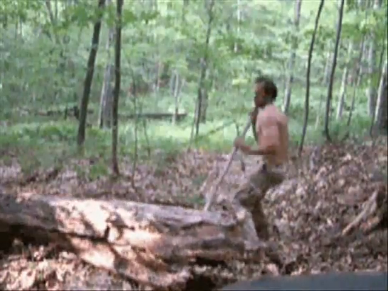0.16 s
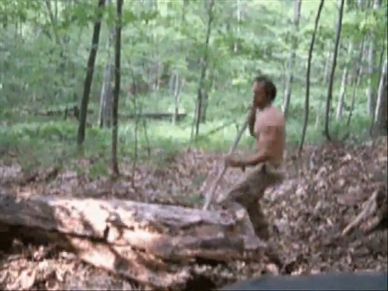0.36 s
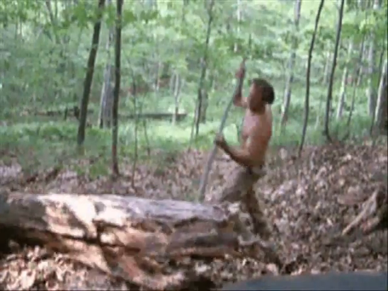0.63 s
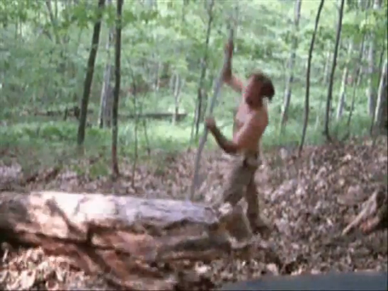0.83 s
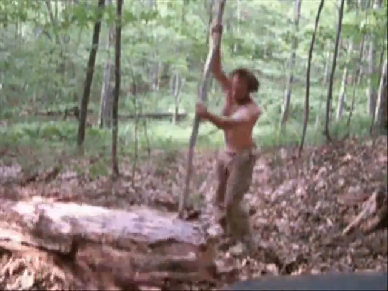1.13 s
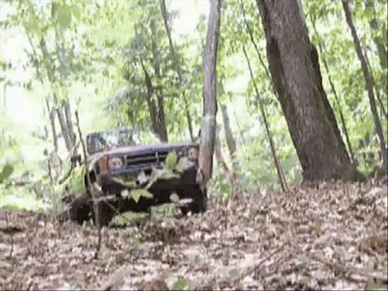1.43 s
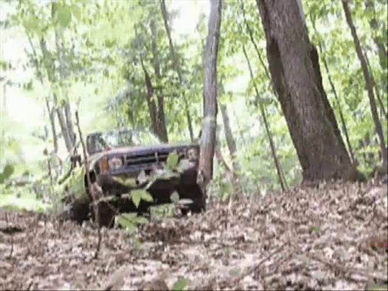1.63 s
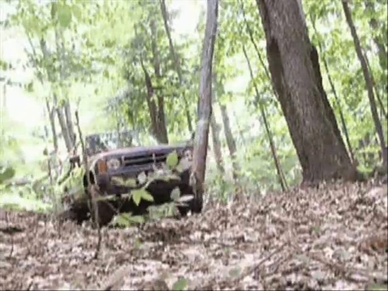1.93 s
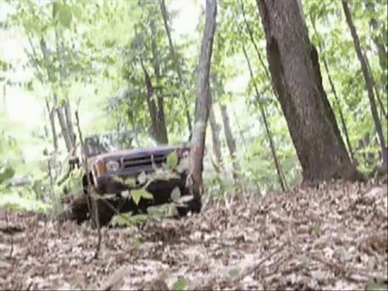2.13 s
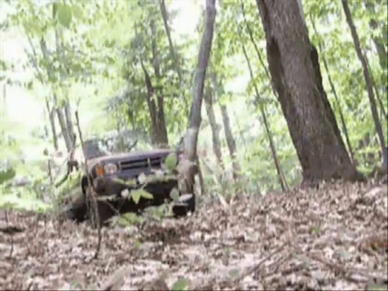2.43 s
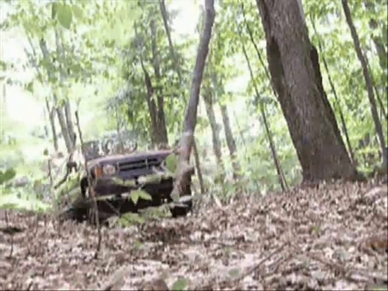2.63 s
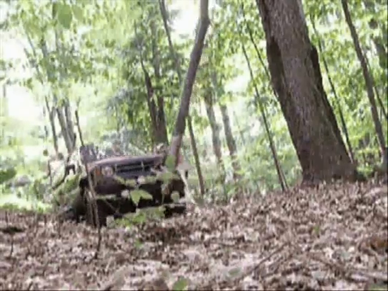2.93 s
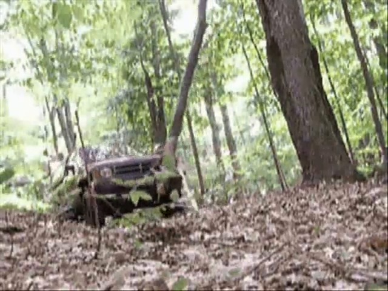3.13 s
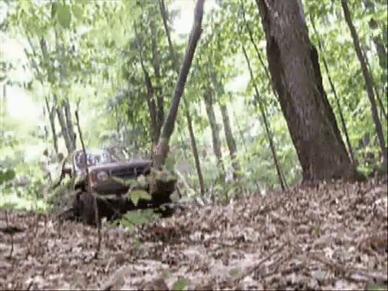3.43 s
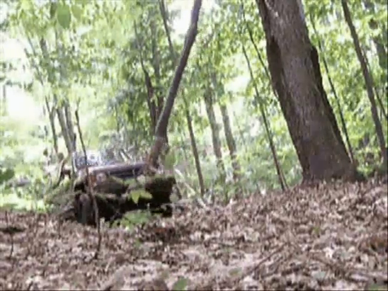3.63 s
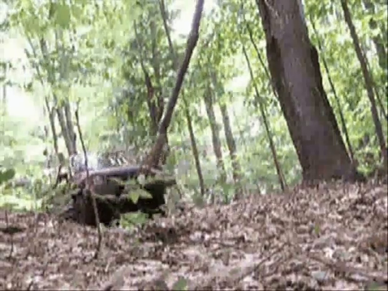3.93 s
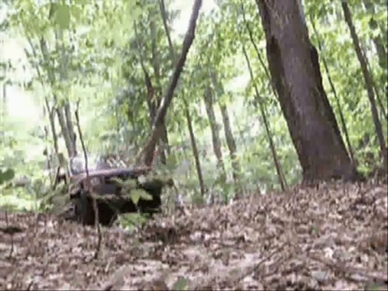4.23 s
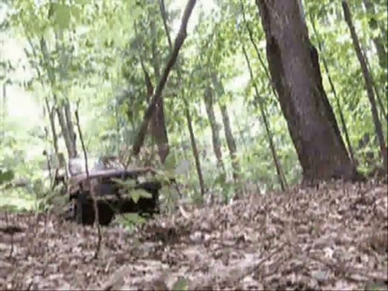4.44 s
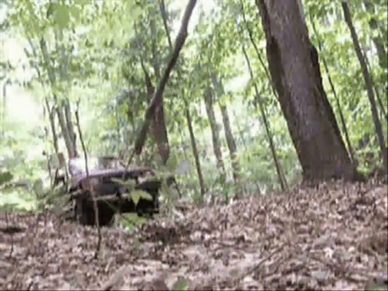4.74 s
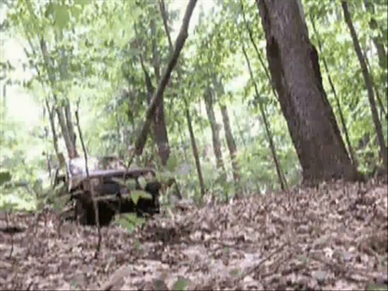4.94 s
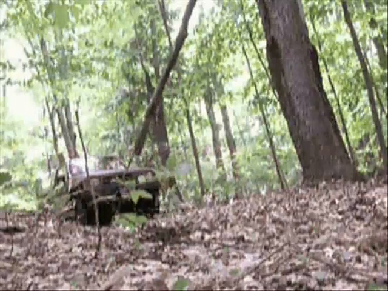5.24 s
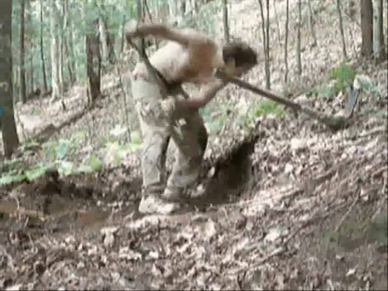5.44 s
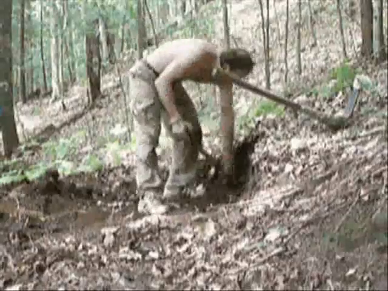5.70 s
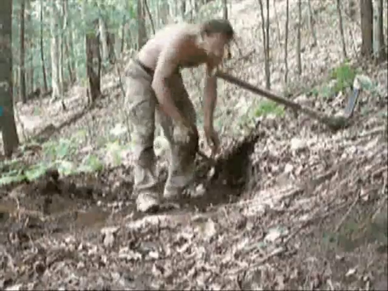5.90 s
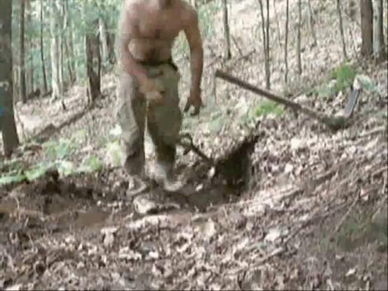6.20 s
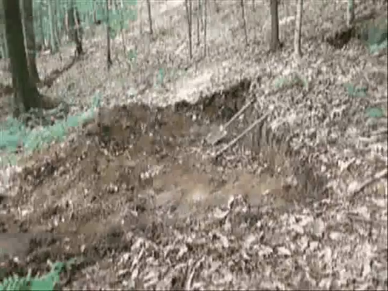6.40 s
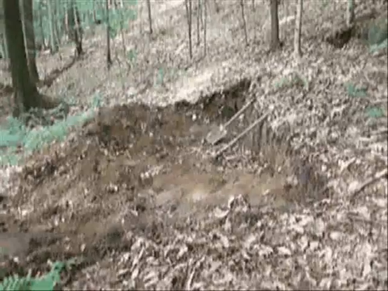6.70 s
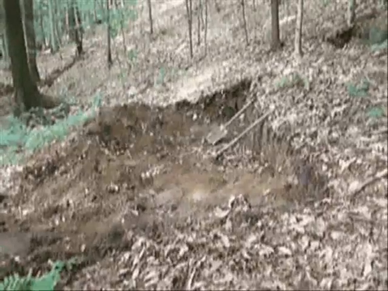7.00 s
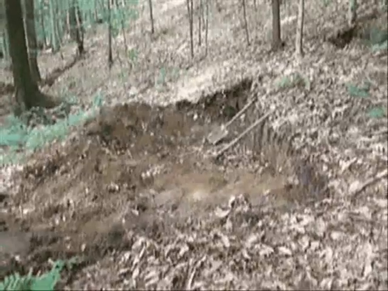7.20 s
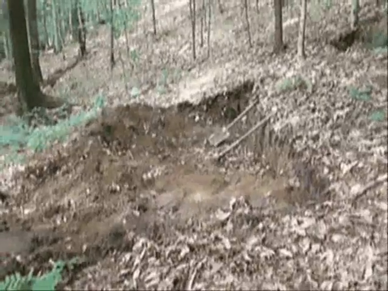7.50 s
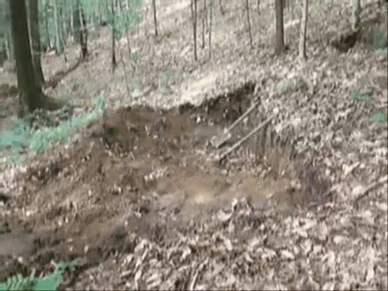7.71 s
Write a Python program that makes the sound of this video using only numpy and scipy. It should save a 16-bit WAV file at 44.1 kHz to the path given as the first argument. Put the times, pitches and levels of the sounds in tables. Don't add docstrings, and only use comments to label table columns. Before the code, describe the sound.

A log rolls crunching through dry leaves, a labouring truck snaps a dead tree with loud cracks, a spade bites soil, then near silence.

```python
import sys
import numpy as np
from scipy import signal
from scipy.fft import rfft, irfft, next_fast_len
from scipy.io import wavfile
from scipy.ndimage import uniform_filter1d, map_coordinates

SR = 44100
rng = np.random.default_rng(int(sys.argv[2]) if len(sys.argv) > 2 else 0)


def store_pcm(level_fs):
    pcm = np.round(np.clip(level_fs, -1, 1) * 32767).astype(np.int16)
    wavfile.write(sys.argv[1], SR, np.atleast_2d(pcm).T)


def rack_gain(trim_db):
    fader = np.asarray(trim_db, float)
    return 10 ** (fader / 20)


N = 346520

# start t/s, end t/s
PARTS = [
    (0, 1.36),
    (1.36, 5.366),
    (5.366, 6.447),
    (6.745, 7.9),
]

# t/s, peak level/dB, ring f/Hz, knock level/dB, splinter level/dB
CRACKS = [(3.221, -4, 3560, -21, -16), (3.252, 11.5, 1777, -9, -16), (3.2554, -10, 3354, 4, -10.5),
          (3.383, -2, 1152, -2.5, -23.5), (3.4354, 2.5, 3346, -13.5, -12), (3.466, 1, 3640, -18, -18.5),
          (3.5272, 3.5, 3064, -12.5, -14.5), (3.7335, 6, 2865, -10, -23.5),
          (3.7372, 3.5, 2996, -13.5, -16.5), (3.8291, -1, 3085, -8, -13), (3.8781, -6, 3547, -12.5, -30),
          (3.9434, -10.5, 3540, -21.5, -8), (3.9618, -1.5, 2480, -20, -25.5), (3.9866, -5, 2820, -10, -13),
          (4.0753, -1, 4160, -13, -22.5), (4.1802, -5.5, 3600, -17.5, -19.5),
          (4.3061, -2, 3540, -13, -10.5), (4.3614, 3.5, 2480, -30, -19), (4.6053, -4, 2303, -13, -21),
          (4.6571, 4, 3460, -18.5, -20), (4.7272, -6, 2950, -9.5, -27.5),
          (4.7881, -2.5, 2400, -16.5, -28.5), (4.9035, 0, 2284, -47, -16.5), (5.7564, 0, 3103, -29, -8)]
# t/s, peak level/dB, ring f/Hz, knock level/dB, splinter level/dB
FIBRES = [(3.4443, -3.5, 3004, -18, -20.5), (3.536, -2.5, 2920, -17, -28), (3.7289, 0, 3170, -10, -24.5),
          (3.7408, 5, 2630, -14.5, -19), (3.7505, -5, 3504, -19.5, -14.5), (3.7557, 0.5, 2543, -12, -16),
          (3.8668, -0.5, 3115, -14, -23.5), (3.8953, -7.5, 3245, -23, -26), (3.9007, -7.5, 3300, -23, -26),
          (3.9673, 1, 3290, -15, -18.5), (4.0664, -7.5, 3100, -19, -21), (4.09, 3, 3300, -23.5, -22.5),
          (4.097, -6.5, 3560, -24, -21.5), (4.1524, -7, 3210, -17, -14.5), (4.1588, 0, 3653, -26, -14.5),
          (4.1675, -5.5, 2386, -18, -25.5), (4.2432, -2, 2960, -16.5, -22), (4.2835, -6, 3420, -16.5, -18),
          (4.3114, -7, 3150, -26, -20.5), (4.3149, -10, 3485, -16.5, -19.5),
          (4.3349, -13.5, 2710, -19, -19.5), (4.3699, -3, 2933, -16, -18),
          (4.3732, -6.5, 2400, -18.5, -19.5), (4.4242, -15.5, 3060, -11, -21),
          (4.4452, -11, 3140, -20, -24), (4.4541, -9.5, 2314, -24.5, -21),
          (4.4722, -12, 3420, -13.5, -20.5), (4.481, -8, 3250, -19.5, -19), (4.4921, -2, 3240, -14, -29),
          (4.5035, -5.5, 2357, -20.5, -19), (4.5376, -3, 3110, -19.5, -22.5),
          (4.547, -9.5, 2646, -17, -22.5), (4.554, 0, 2400, -16.5, -31), (4.6654, -3, 3320, -18.5, -25),
          (4.677, -3, 3683, -21, -24.5), (4.7029, -13, 2940, -21, -22), (4.7074, -8, 2860, -17.5, -27.5),
          (4.7784, -8, 3810, -24, -22.5)]
# t/s, peak level/dB, ring f/Hz, knock level/dB
TWIGS = [(0.9018, -17, 2823, -7), (0.952, -26, 2920, 0), (0.965, -28, 2930, -4), (1.0165, -14, 3300, -14.5),
         (1.021, -9.5, 3550, -13.5), (1.0516, -18, 3060, -10), (1.2314, -25, 3305, -8.5),
         (2.2635, -11.5, 4190, -14), (2.3037, -10.5, 4530, -28), (2.383, -12, 3120, -12),
         (2.444, -19, 3950, -29), (2.614, -11.5, 2758, -19.5), (2.6539, -7, 3430, -38),
         (2.6611, -4, 3350, -37), (2.6745, -5.5, 2774, -46), (2.6984, -12, 3013, -30),
         (2.7933, -18.5, 4690, -22.5), (2.763, -24, 2525, -13), (2.851, -12, 2550, -11.5),
         (2.9212, -16.5, 2500, -4.5), (2.934, -13, 2490, -20.5), (2.997, -18.5, 3720, -22.5),
         (3.1422, -15, 2842, -10.5), (5.2384, -16.5, 3106, -28), (5.739, -25, 2964, -19),
         (5.743, -17.5, 3177, -20), (5.7511, -8, 3100, -18), (5.7623, -11, 3326, -35.5),
         (5.7764, -14, 3720, -31), (6.0832, -30.5, 3026, -16)]
# t/s, peak level/dB, pitch f/Hz
THUDS = [(.9025, -21, 480), (0.953, -24, 230), (1.022, -21, 540), (1.03, -25, 330), (1.051, -17, 590),
         (3.252, -5.5, 302), (3.385, -18.5, 229), (3.528, -17.5, 207), (3.734, -10.5, 320),
         (4.305, -20, 299), (4.659, -26.5, 60.9), (5.239, -16.5, 236), (5.754, -13.5, 366),
         (5.756, -36.5, 109.5)]
# t/s, peak level/dB, f/Hz
TRUNK_MODES = [(3.2546, -0.5, 902), (3.251, -4.5, 1760), (3.383, -7.5, 1200), (3.4355, -11.5, 800),
               (3.4665, -12, 700), (3.468, -9.5, 2420), (3.527, -1, 1050), (3.53, -11, 880),
               (3.734, -3, 775), (3.735, -11.5, 1380), (3.737, -10.5, 1800), (3.7549, -12, 1110),
               (3.8291, -7, 1010), (3.8271, -1, 1740), (3.8665, -13, 1210), (3.8792, -16.5, 923),
               (3.9607, -12.5, 883), (3.9624, -14, 1650), (3.985, -19, 1060), (4.0773, -14, 1400),
               (4.1805, -10, 2290), (4.2432, -18.5, 840), (4.3064, -9.5, 2510), (4.3597, -6.5, 2570),
               (4.5377, -10.5, 2420), (4.5376, -24, 1450), (4.555, -20, 1400), (4.6035, -15, 2250),
               (4.6039, -8, 3700), (4.6563, -5.5, 2380), (4.7272, -21, 845), (4.7266, -8.5, 2210),
               (4.7885, -7.5, 2310), (4.7881, -17.5, 842), (4.9035, -6, 2300), (4.9035, -13, 4900),
               (2.6742, -22, 2700), (2.7917, -12, 4600)]
# f/Hz, level/dB
CRACK_COLOUR = [(60, -50.5), (300, -27.5), (1200, -9.5), (3200, 2.5), (5000, -5.5), (7000, -36),
                (9000, -39.5), (10000, -44)]
KNOCK_COLOUR = [(100, -33), (300, -16.5), (700, -2), (1300, 1), (2000, -7.5), (4000, -44)]
SPLINTER_COLOUR = [(3000, -31), (5000, 0), (6500, 1), (8000, -9), (10000, -29.5), (13000, -56.5)]
# f/Hz, t60/s
TREE_DECAY = [(200, 0.16), (2000, 0.17), (9000, 0.1)]

# t/s, rustle level/dB
STIR = [
    [(0, -40.5), (.4, -42.5), (.65, -33), (.8, -25.5), (1.0, -20.5), (1.11, -18.5), (1.17, -27.5),
     (1.36, -30.5)],
    [(1.36, -37), (2.25, -42.5), (2.6, -35), (2.85, -29.5), (3.25, -27.5), (3.6, -23), (4.0, -29),
     (4.5, -37), (4.85, -38), (5.36, -47)],
    [(5.37, -49.5), (5.72, -54.5), (5.95, -45), (6.25, -51), (6.44, -53)],
]
# level/dB at a rustle of -30 dB, growth with the rustle (exponent)
GRINDING = [
    (-33.5, 0.63),
    (-33.5, 1.1),
    (-39, 0.098),
]
# peak t/s, leaves level/dB, fibres level/dB, fall t/s
SHOWERS = [(.12, -37, -52, 0.083), (.88, -36, -28, 0.13), (1.04, -18.5, -18, 0.029), (2.4, -30, -37, 0.089),
           (2.69, -23, -50, 0.11), (3.0, -27, -42, 0.055), (3.33, -17, -18, 0.083),
           (3.4, -24, -24.5, 0.046), (3.49, -21.5, -38, .08), (3.62, -22, -35.5, 0.041),
           (3.82, -18, -26, 0.086), (4.11, -28, -34, 0.032), (4.32, -24, -26, 0.047),
           (4.39, -25, -28.5, 0.16), (4.5, -32, -26.5, 0.066), (4.68, -24.5, -28, 0.11),
           (4.92, -26.5, -46, 0.19), (5.07, -32.5, -41, 0.095), (5.24, -27, -33.5, 0.061),
           (5.747, -55, -51, 0.058), (5.83, -29, -51, 0.071), (6.12, -48, -42, 0.055),
           (6.2, -53, -33.5, .06)]
# t/s, level/dB
CHAFF = [(1.36, -29.5), (2.6, -23), (2.68, -3.5), (2.85, -12), (3.2, -24.5), (5.365, -22.5)]
# t/s, level/dB
SCUFF = [
    (5.9, -75),
    (6.07, -63),
    (6.12, -53),
    (6.28, -56),
    (6.36, -75),
]
# f/Hz, level/dB per Hz
LEAF_COLOUR = [(530, -48), (900, -20.5), (1320, -10), (1790, -6), (2250, -3.5), (2900, 3.5), (3610, 2.5),
               (5000, -3), (6960, -14.5), (9040, -29.5), (10000, -52), (13000, -76), (22000, -120)]
GRIND_COLOUR = [(150, -33.5), (400, -16.5), (800, 2.5), (1500, 5), (2200, -1), (4000, -42.5)]
GRAIN_COLOUR = [(1500, -32), (2000, -4.5), (2350, 0.5), (2800, -1.5), (3500, -40)]
HOLLOW_COLOUR = [(40, -8.5), (90, -11), (170, -0.5), (300, 1), (600, 2), (900, -2), (1600, -23)]

# t/s, firing rate f/Hz, load level/dB, bark of the upper orders level/dB
ENGINE = [(1.362, 40.87, -42, 2), (1.5, 40.15, -40, -2.5), (1.85, 36.55, -40, -5), (2.06, 35.67, -36, -13),
          (2.33, 33.7, -41.5, -6), (2.45, 34, -40, -6), (2.622, 38.4, -36, -4), (2.721, 41.8, -45, 4.5),
          (2.85, 47.73, -45, 6.5), (3.0, 53.26, -34, -6), (3.12, 61.1, -34.5, -2.5),
          (3.228, 65.3, -36.5, -4.5), (3.32, 72, -52.5, -2.5), (3.948, 85.3, -55, -3), (4.74, 50, -55, -5),
          (4.91, 47.1, -49, -12), (5.02, 36.7, -46.5, -6.5), (5.366, 35.8, -50, -2)]
ORDER_DB = [-1.5, 0.5, -4.5, -5.5, -11, -18]
ORDER_TILT_DB = [-2.5, 1, 7, -13.5, -7.5, 1]
# f/Hz, level/dB
PIPE = [(35, -0.5), (70, -3), (95, 0), (118, -6), (148, 7), (165, -1), (190, -4), (212, -0.5), (228, -2.5),
        (248, 4.5), (290, -8)]
# t/s, level/dB
BODY_BOOM = [(1.36, -5), (2.6, -5), (2.78, 2), (2.95, 0.5), (3.08, -4), (3.3, -5.5), (5.0, -1), (5.2, 10),
             (5.365, 4)]
# t/s, level/dB
BANK_BALANCE = [(1.36, 5), (1.58, 1), (1.68, -4), (1.85, -2.5), (2.25, 2), (2.45, -6), (2.75, -8.5),
                (3.15, 6), (5.365, 3)]
# f/Hz, level/dB per Hz
LABOUR_COLOUR = [(60, -32.5), (110, -4.5), (170, 0.5), (250, -2), (400, -32)]
# t/s, level/dB
LABOUR_LEVEL = [(1.36, -57.5), (1.95, -53), (2.3, -42), (2.65, -47.5), (3.2, -50.5), (3.4, -58),
                (5.365, -53)]
# start t/s, length t/s
SLIPS = [
    (1.448, 0.12),
    (1.882, 0.11),
    (2.26, 0.08),
]
# t/s, level/dB
BELT_WEAR = [(1.36, -0.5), (2.3, -5), (2.42, -5), (2.62, 0), (3.2, -6), (5.365, -1.5)]
# t/s, level/dB
DUCK = [(1.36, -1), (2.6, 1.5), (3.2, -4), (3.42, -7), (3.6, -17.5), (4.2, -24.5), (4.43, -11),
        (4.8, -11.5), (5.365, 0.5)]
# f/Hz, level/dB per Hz
HISS_COLOUR = [(290, -34.5), (500, -17.5), (1230, -14), (2250, -3.5), (3800, 1), (4600, 0), (5080, -3.5),
               (7200, 0), (7800, -14.5), (8930, -12.5), (10000, -39), (13000, -120)]
# t/s, level/dB
RATTLE = [(2.6, -52), (2.75, -41.5), (2.95, -35), (3.2, -31), (3.35, -41), (3.6, -46), (4.35, -43.5),
          (4.42, -30), (4.53, -34), (4.65, -45.5), (4.8, -60.5)]

AIR_DB = [-47.5, -41, -44.5, -45]
# f/Hz, level/dB per Hz
VALLEY_COLOUR = [(15, -44), (30, -13), (65, -1.5), (150, -6), (220, -6), (820, -10), (950, -8),
                 (1080, -7.5), (2460, -15), (3500, -20), (4000, -25), (7000, -31.5), (8000, -38),
                 (10000, -57.5), (13000, -120)]
SLOPE_COLOUR = [(15, -22), (25, -8), (90, 5), (124, -0.5), (394, -0.5), (506, 3.5), (1160, -2), (2220, -18),
                (4260, -23), (7980, -38), (10000, -42), (13000, -87), (22000, -120)]
ROAD_COLOUR = [(650, -40), (800, -3), (960, 0), (1100, -6), (1350, -41)]
DRONE_COLOUR = [(20, -20), (40, -7), (66, 1), (92, -1.5), (130, -33.5)]
GAP_NOISE_DB = [-64, -83]
GAP_NOISE_DB_PER_S = [500, 220]


def unit(x):
    return x / np.sqrt(np.mean(x ** 2) + 1e-20)


def along(points, hz):
    f, v = np.transpose(points)
    return np.interp(np.log(hz + 1), np.log(f + 1), v)


def in_part(k):
    t = np.arange(N) / SR
    return (t >= PARTS[k][0]) & (t < PARTS[k][1])


def curve(rows):
    rows = np.transpose(rows)
    return np.interp(np.arange(N) / SR, rows[0], rows[1])


def gains(tables, first=0):
    out = np.zeros(N)
    for k, rows in enumerate(tables, start=first):
        out = np.where(in_part(k), rack_gain(curve(rows)), out)
    return out


def wobble(rate):
    return map_coordinates(rng.standard_normal(int(N * rate / SR) + 4), [np.arange(N) * rate / SR])


def filtered(x, response):
    m = next_fast_len(N + 8192)
    return irfft(rfft(x, m) * response(np.fft.rfftfreq(m, 1 / SR)), m)[:N]


def rush(colour, patchy_db):
    z = signal.stft(rng.standard_normal(N + 512), nperseg=512)[2]
    field = uniform_filter1d(rng.standard_normal(z.shape), size=6, axis=0)
    field = uniform_filter1d(field, size=10, axis=1)
    noise = signal.istft(z * rack_gain(patchy_db * unit(field)), nperseg=512)[1][:N]
    return unit(filtered(noise, lambda hz: rack_gain(along(colour, hz))))


def crackle(colour, rate, spread_db, life):
    chance, size = rng.random((2, N))
    strikes = (chance < rate / SR) * rack_gain(-spread_db * np.log(size + .01))
    envelope = signal.lfilter([1], [1, -np.exp(-1 / (life * SR))], strikes)
    return unit(filtered(unit(envelope) * rng.standard_normal(N), lambda hz: rack_gain(along(colour, hz))))


def even(fade, draw):
    x = fade * draw
    for _ in range(3):
        x = irfft(np.exp(1j * np.angle(rfft(x))), len(x))
        x = np.clip(x * np.linalg.norm(fade) / np.linalg.norm(x), -2 * fade, 2 * fade)
    return x


def all_breaks():
    breaks = [(*row, 0.017) for row in CRACKS]
    for s, db, hz, knock_db in TWIGS:
        bright_db = -13.5 - 0.27 * (knock_db + 30)
        breaks.append((s, db, hz, knock_db, bright_db, 0.017))
    return breaks + [(s, db - 1.5, *row, 0.013) for s, db, *row in FIBRES]


def snaps():
    t = np.arange(2048) / SR
    burst, ring, knock, splinter = np.zeros((4, N + len(t)))
    rise = (1 - np.exp(-t / 0.00052)) ** 2
    for s, db, hz, knock_db, bright_db, t60 in all_breaks():
        draw = rng.standard_normal((4, len(t)))
        at = slice(round(s * SR), round(s * SR) + len(t))
        fade = rack_gain(db - 60 * t / t60) * rise
        burst[at] += even(fade, draw[0])
        ring[at] += fade * np.sin(2 * np.pi * hz * t + 0.18 * np.cumsum(draw[1]))
        knock[at] += rack_gain(knock_db) * even(fade * rack_gain(6 * t / t60), draw[2])
        splinter[at] += rack_gain(bright_db) * even(fade, draw[3])
    for s, db, hz in THUDS:
        ring[round(s * SR):][:len(t)] += rack_gain(db - 60 * t / 0.029) * np.sin(2 * np.pi * hz * t)
    for s, db, hz in TRUNK_MODES:
        ring[round(s * SR):][:len(t)] += rack_gain(db + 5 - 60 * t / .016) * rise * np.sin(2 * np.pi * hz * t)

    def tone(x, colour, db):
        return filtered(x[:N], lambda hz: rack_gain(along(colour, hz) + db))

    wood = tone(burst, CRACK_COLOUR, db=5.0) + tone(knock, KNOCK_COLOUR, db=18.0)
    return wood + tone(splinter, SPLINTER_COLOUR, db=14.5) + rack_gain(-3) * ring[:N]


def tree_echo(x):
    hz, t, z = signal.stft(rng.standard_normal(SR // 2), SR, nperseg=256)
    tail = signal.istft(z * rack_gain(-60 * t / along(TREE_DECAY, hz)[:, None]), SR, nperseg=256)[1]
    late = np.pad(x, (200, 0))
    return signal.fftconvolve(late, tail / np.linalg.norm(tail))[:N]


def showers():
    s, leaves_db, fibres_db, fall = np.transpose(SHOWERS)
    t, starts = np.arange(0, N, 32) / SR, np.transpose(PARTS)[0]
    since = t - s[:, None]
    power = np.exp(-2 * np.maximum(since / fall[:, None], -since / 0.046))
    same_part = np.searchsorted(starts, t, 'right') == np.searchsorted(starts, s, 'right')[:, None]
    return np.repeat(rack_gain([leaves_db, fibres_db]) ** 2 @ (power * same_part), 32, axis=1)[:, :N]


def dry_leaves(clumps):
    ticks = (0.12 + .5 * in_part(1)) * crackle(LEAF_COLOUR, rate=460, spread_db=0, life=0.00067)
    leaves = unit(clumps * (rush(LEAF_COLOUR, patchy_db=0.5) + ticks))
    flake_gain = rack_gain(-9.0) * in_part(2) + rack_gain(-10.5) * in_part(0) + gains([CHAFF], first=1)
    flakes = crackle(SPLINTER_COLOUR, rate=2200, spread_db=-0.5, life=0.0015)
    grain = clumps * crackle(GRAIN_COLOUR, rate=350, spread_db=5.5, life=0.0015)
    return leaves + flake_gain * flakes + rack_gain(-6.5) * in_part(1) * grain


def torn_fibres(clumps):
    ticks = clumps * crackle(GRIND_COLOUR, rate=300, spread_db=2.5, life=0.00072)
    return rush(GRIND_COLOUR, patchy_db=4.0) + in_part(1) * 1.1 * ticks


def rolling_log(rustle):
    roll = in_part(0) * rack_gain(-33) * (10 * rustle) ** 1.5
    return roll * unit(rack_gain(.8 * wobble(30)) * rush(HOLLOW_COLOUR, patchy_db=.6))


def soil_spill():
    since = np.arange(N) / SR - 5.792
    fall = (since > 0) * np.exp(-np.abs(since) / .04)
    return rack_gain(-22) * fall * crackle(HISS_COLOUR, rate=3200, spread_db=-0.5, life=0.0016)


def boot_scuff(leaves):
    centre_hz, width_hz = 3260, 480
    band = lambda f: (1j * f * width_hz / (centre_hz ** 2 - f * f + 1j * f * width_hz)) ** 2
    return gains([SCUFF], first=2) * unit(filtered(leaves, band))


def litter():
    clumps = rack_gain(0.8 * wobble(60))
    leaves, fibres = dry_leaves(clumps), torn_fibres(clumps)
    stir, (falling, torn) = gains(STIR), showers()
    level_db, grows = sum(in_part(k) * np.array(row)[:, None] for k, row in enumerate(GRINDING))
    tear = rack_gain(level_db) * (stir / rack_gain(-30) + 1e-9) ** grows
    heard = in_part(0) | in_part(1) | in_part(2)
    rustle = heard * np.sqrt(stir ** 2 + falling)
    grind = heard * np.sqrt(tear ** 2 + torn)
    floor = rustle * leaves + rack_gain(-8.0) * grind * fibres
    return floor + rolling_log(rustle) + soil_spill() + boot_scuff(leaves)


def exhaust(turn):
    t = np.arange(N) / SR
    s, rate_hz, load_db, bark_db = np.transpose(ENGINE)
    octaves = np.log2(np.clip(rate_hz / rate_hz[0], 1, 2))
    orders = np.zeros(N)
    for k, (order_db, tilt_db) in enumerate(zip(ORDER_DB, ORDER_TILT_DB), start=1):
        db = load_db + order_db + tilt_db * octaves + along(PIPE, k * rate_hz)
        if k > 1:
            db = db + bark_db
        if k == 3:
            db = db + np.interp(s, *np.transpose(BODY_BOOM))
        if k == 4:
            db = db + np.interp(s, *np.transpose(BANK_BALANCE))
        level_db = np.interp(t, s, db) + 5.0 + (0.7 + .25 * k) * wobble(15)
        orders += rack_gain(level_db) * np.sin(k * turn)
    return orders


def fan_belt(throb):
    t, slip = np.arange(N) / SR, np.zeros(N)
    for start, length in SLIPS:
        slip += ((t > start) & (t < start + length)) * np.minimum((t - start) / 0.24, 1)
    squeal = throb * wobble(480) * np.sin(2 * np.pi * np.cumsum(4310 + 256 * slip) / SR)
    return rack_gain(-36 + 8.5 * slip + 1.1 * curve(DUCK) + curve(BELT_WEAR)) * unit(squeal)


def engine():
    turn = 2 * np.pi * np.cumsum(curve(ENGINE) * (1 + 0.0054 * wobble(8.6))) / SR
    throb = 1 + 0.11 * np.cos(turn) + 0.23 * np.exp(6 * (np.cos(turn / 4) - 1))
    rough = rack_gain(curve(LABOUR_LEVEL)) * rush(LABOUR_COLOUR, patchy_db=4.0)
    bay = rack_gain(-33 + curve(DUCK)) * unit(throb * rush(HISS_COLOUR, patchy_db=1.0))
    return in_part(1) * (exhaust(turn) + rough + bay + fan_belt(throb))


def rattle():
    taps = (rng.random(N) < 200 / SR) * rack_gain(1.5 * rng.standard_normal(N)) + 0.04 * rng.standard_normal(N)

    def mode(f, centre_hz, width_hz, db):
        return rack_gain(db) * 1j * f * width_hz / (centre_hz ** 2 - f * f + 1j * f * width_hz)

    modes = lambda f: mode(f, 1460, 130, -2.5) + mode(f, 2400, 140, -5.0)
    return gains([RATTLE], first=1) * unit(filtered(taps, modes))


def fade_in_db():
    return 60.5 * np.minimum(np.arange(N) / SR - 7.2, 0)


def air():
    colour = np.where(in_part(2), rush(SLOPE_COLOUR, patchy_db=-0.7), rush(VALLEY_COLOUR, patchy_db=1.08))
    roar_db = 6 * np.log2(curve(ENGINE) / ENGINE[0][1]) + 0.63 * curve(DUCK)
    fade_db = fade_in_db()
    level = sum(in_part(k) * rack_gain(db) for k, db in enumerate(AIR_DB))
    level = level * rack_gain(in_part(1) * roar_db + in_part(3) * fade_db)
    tyres = in_part(3) * rack_gain(-50 + fade_db) * rush(ROAD_COLOUR, patchy_db=2.0)
    return rack_gain(5.5) * level * rack_gain(0.39 * wobble(6.6)) * colour + tyres


def distance():
    t, end, start = np.arange(N) / SR, PARTS[2][1], PARTS[3][0]
    gap_noise = sum(rack_gain(db - rate * np.abs(t - edge)) for db, rate, edge in zip(GAP_NOISE_DB, GAP_NOISE_DB_PER_S, (end, start)))
    drone = in_part(3) * rack_gain(-59.5 + fade_in_db()) * rush(DRONE_COLOUR, patchy_db=4.0)
    return drone + ((t >= end) & (t < start)) * gap_noise * rush(VALLEY_COLOUR, patchy_db=-3.0)


def scene():
    wood = snaps()
    mix = wood + rack_gain(-13) * tree_echo(wood) + litter() + engine() + rattle() + air() + distance()
    return np.tile(mix, (2, 1))


def microphone(hz):
    centre_hz, width_hz = 3300, 1000
    port = rack_gain(-10) * 1j * hz * width_hz / (centre_hz ** 2 - hz ** 2 + 1j * hz * width_hz)
    return (1 + port) * np.clip((9950 - hz) / 500, 0, 1)


def band_limit(x):
    return signal.sosfilt(signal.butter(12, 17000, fs=SR, output="sos"), x)


def record(dry):
    low = filtered(dry[0], microphone)
    clipped = np.clip(low, -1, 1)[::2]
    thin = lambda hz: np.where(hz < 2 * 9950, 1, rack_gain(-4.5))
    stored = filtered(np.pad(clipped, (0, N - len(clipped))), thin)
    held = np.repeat(stored, 2)[:N]
    limited = np.clip(filtered(held, lambda hz: np.clip((16000 - hz) / 250, 0, 1)), -1, 1)
    return band_limit(np.tile(limited, (2, 1)))


dry = scene()
out = record(dry)
store_pcm(out)
```